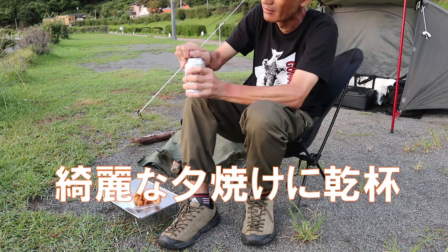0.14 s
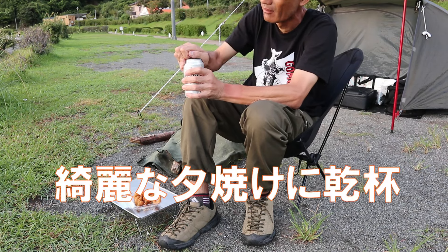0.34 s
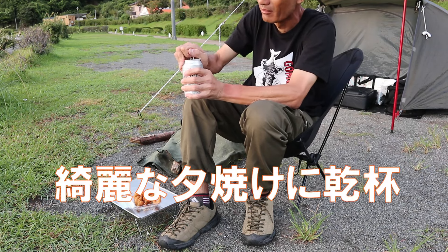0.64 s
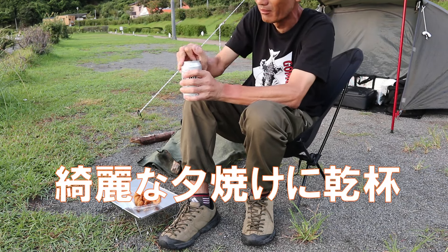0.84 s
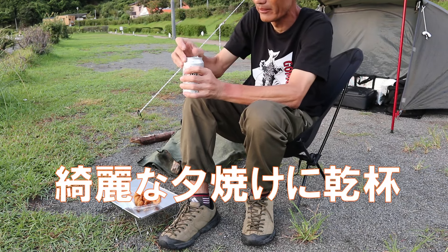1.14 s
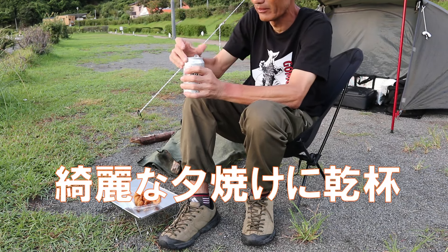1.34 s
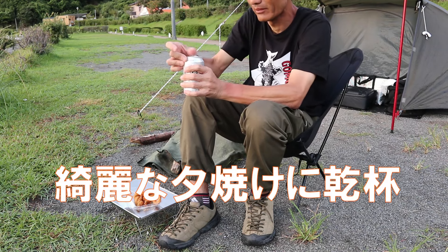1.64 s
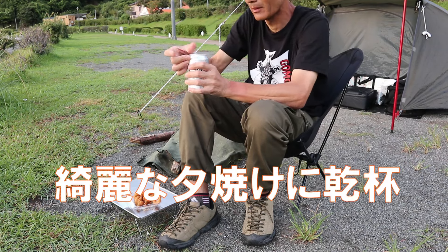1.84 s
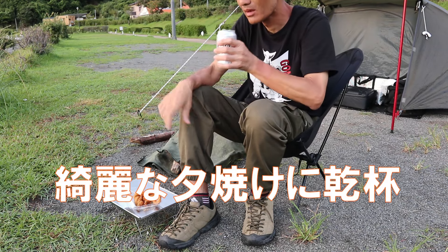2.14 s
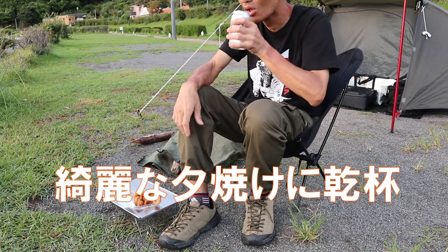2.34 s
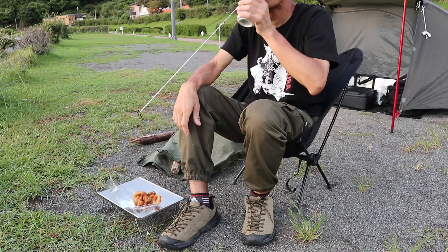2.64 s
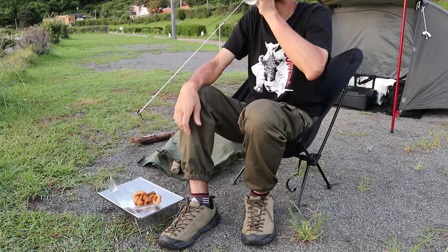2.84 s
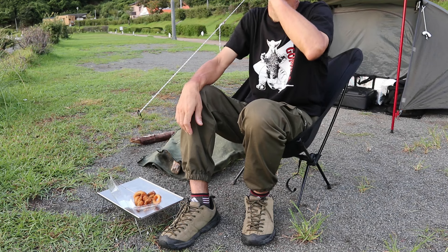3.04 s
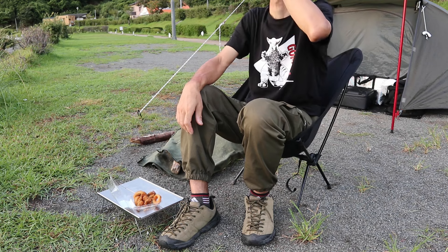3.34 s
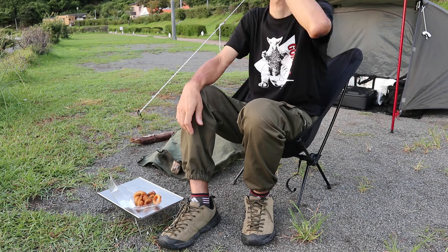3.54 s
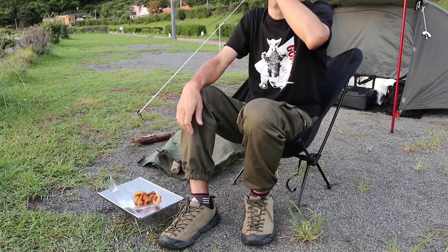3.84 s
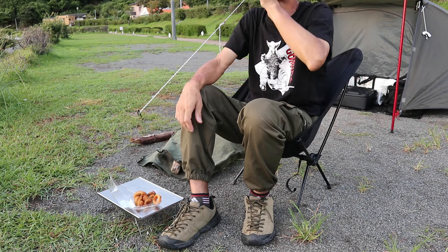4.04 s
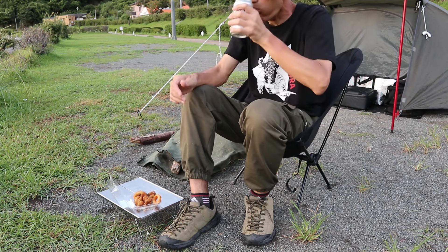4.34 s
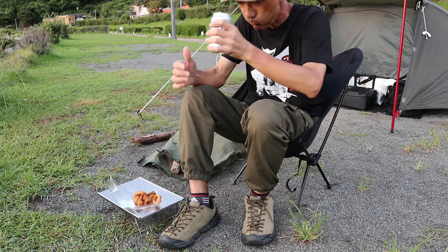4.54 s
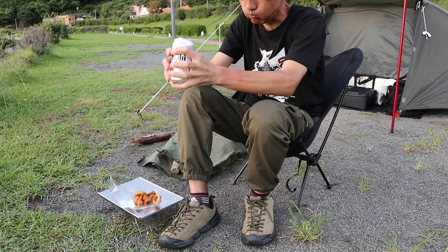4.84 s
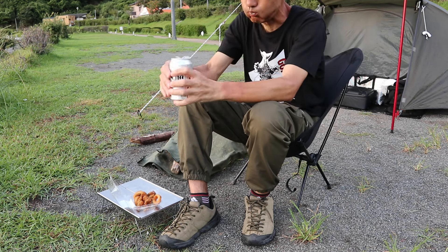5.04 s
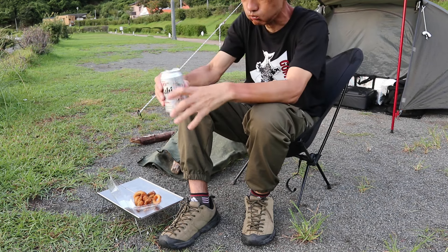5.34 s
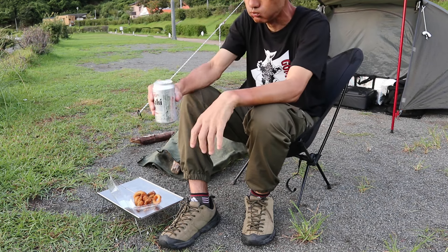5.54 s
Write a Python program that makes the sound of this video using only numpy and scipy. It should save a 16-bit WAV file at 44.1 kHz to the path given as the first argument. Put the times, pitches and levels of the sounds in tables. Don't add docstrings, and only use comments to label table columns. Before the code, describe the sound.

Close snap, brief gas hiss and hard aluminium clicks of an opening can outdoors, followed by faint cicada, road roar and a growing low engine drone.

```python
import sys
import numpy as np
from scipy import signal
from scipy.io import wavfile
from scipy.ndimage import uniform_filter1d, map_coordinates

SR = 44100
rng = np.random.default_rng(int(sys.argv[2]) if len(sys.argv) > 2 else 0)


def master(y):
    cut = np.clip(np.atleast_2d(y).T, -1, 1)
    pcm = np.round(cut * 32767)
    wavfile.write(sys.argv[1], SR, pcm.astype(np.int16))


def boost(x):
    u = np.asarray(x, float) / 20
    return 10 ** u


N = 251370


def evened(x):
    return x / np.sqrt(np.mean(x ** 2) + 1e-20)


def add(mix, s, sound):
    part = mix[round(s * SR):][:len(sound)]
    part += sound[:len(part)]


def trace(rows):
    s, *columns = np.transpose(rows)
    t = np.arange(s[0], s[-1], 1 / SR)
    return s[0], [np.interp(t, s, c) for c in columns]


def drift(rate, size=N):
    knots = rng.standard_normal(400)
    coarse = np.arange(0, size + 32, 32)
    curve = map_coordinates(knots, [coarse * rate / SR], order=3, mode="wrap")
    return np.interp(np.arange(size), coarse, curve)


def resonate(x, hz, width):
    turn = np.exp(2j * np.pi * np.cumsum(hz * np.ones(len(x))) / SR)
    r = np.exp(-np.pi * width / SR)
    once = signal.lfilter([1 - r], [1, -r], x / turn + 1e-18)
    twice = signal.lfilter([1 - r], [1, -r], once)
    return 2 * (turn * twice).real


def ring(modes, t, scale=1):
    return sum(boost(db - 60 * t / t60) * np.sin(2 * np.pi * hz * scale * t) for hz, db, t60 in modes)


# start in seconds, peak in dB, rim fizz in dB, lid note in Hz.
CAN_CRACKS = [
    (.3369, -2, -10, 5000),
    (.3382, -14, -20, 3700),
    (.3396, -14, -20, 3650),
              (.4242, 0.5, -25, 3270), (0.5811, -9.5, -28, 5050), (0.598, -26, -18, 4560),
              (.604, -31, -4, 4700), (.628, -36, 3, 4400), (0.636, -22, 19, 3920), (0.643, -24.5, -5, 4600),
              (.649, -31, -1, 4600), (.676, -47, -4, 4600), (.68951, -3, -10.5, 3400),
              (0.68952, -4, -13, 5800), (.6891, -15, -4, 4300), (.7025, -51, 0, 4300),
              (.710, -41, -6, 4800), (.724, -39, -3.5, 4500), (0.779, -33.5, -6, 4530),
              (.803, -52, -4, 5530), (.81, -52, -4, 4970), (0.847, -33.5, -22, 5050),
              (.853, -34, -12, 3300), (.87, -37, -13, 3000), (1.608, -35, -9, 2203), (3.505, -38, 20, 5900),
              (3.512, -45, 18, 6000)]
# frequency as a multiple of the note, level in dB, t60 in seconds.
LID_MODES = [(.72, -43, .003), (1, 10, 0.0067), (1.12, 10, 0.0037), (1.48, 6, 0.0029), (1.9, -5, 0.00268)]
# frequency in Hz, level in dB, t60 in seconds.
RIM_MODES = [(7850, 14.5, 0.0017), (9600, 4, 0.0057), (10400, -4, 0.0052), (13000, -24, .003)]


def cracks():
    out, t = np.zeros(N), np.arange(800) / SR
    for s, peak_db, fizz_db, note_hz in CAN_CRACKS:
        drive = 0.19 * rng.standard_normal(300) * np.exp(-t[:300] / 0.0015)
        drive[0] = 1
        rim_scale = 1 + 0.041 * rng.uniform(-1.2, 1)
        metal = ring(LID_MODES, t, note_hz) + boost(fizz_db) * ring(RIM_MODES, t, rim_scale)
        sound = np.convolve(drive, metal)
        add(out, s, boost(peak_db) * sound / abs(sound).max())
    return out


# start in seconds, peak in dB, low ring in dB, spring-back share 0-1, choked after seconds.
SHELL_DENTS = [
    (.4244, -1.5, -5.5, 0.42, 0.0047),
    (0.5808, -19, -18, 0.7, 0.0048),
    (0.6897, 2.5, 0.5, 0.07, 0.0033),
]
# frequency in Hz, level in dB, t60 in seconds.
SHELL_MODES = [(1473, 2, 0.14)]
# frequency in Hz, level in dB, t60 in seconds.
LOW_SHELL_MODES = [(617, -8.5, 0.044), (1174, -1.5, 0.069)]


def dents():
    out, t = np.zeros(N), np.arange(2600) / SR
    rebound_s = 0.002176
    for s, peak_db, low_db, rebound, grip_s in SHELL_DENTS:
        sound = ring(SHELL_MODES, t) + boost(low_db) * ring(LOW_SHELL_MODES, t)
        add(sound, rebound_s, -rebound * sound.copy())
        sound *= np.exp(-(t / grip_s) ** 6)
        sound += ring([(1560, -23, 0.048)], t)
        add(out, s, -boost(peak_db) * sound / abs(sound).max())
    return out


def jet_course():
    tight, wide = 1.16, 0.88
    return [(.3366, -49.5, tight), (.33699, -15, tight), (.3406, -23, 1), (.37, -21, 1),
            (.403, -25, wide), (.419, -30.5, 1), (.437, -49.5, 1), (.47, -49.5, wide)]


# frequency in Hz, width in Hz, level in dB.
SLIT_TONES = [(5400, 4000, 5), (10300, 2800, 5), (11780, 2200, -14.5)]
# frequency in Hz, width in Hz, level in dB.
HOLLOW_BODY = [(1477, 660, -1), (3050, 1700, -13.5), (673, 633, -8)]


def gas():
    s, (db, slit) = trace(jet_course())
    jet = rng.standard_normal(len(db)) * boost(0.76 * drift(350, size=len(db)))
    tones = sum(boost(d) * evened(resonate(jet, hz * slit, w)) for hz, w, d in SLIT_TONES)
    body = sum(boost(d) * evened(resonate(jet, hz, w)) for hz, w, d in HOLLOW_BODY)
    body *= 1.5 - np.exp(-np.arange(len(db)) / SR / 0.021)
    out = np.zeros(N)
    add(out, s, boost(db) * evened(tones + body + 1.03 * jet))
    return out


def can():
    highpass = signal.butter(N=4, Wn=420, btype="high", fs=SR, output="sos")
    near = signal.sosfilt(highpass, cracks() + dents() + gas())
    t = np.arange(4000) / SR
    scatter = uniform_filter1d(rng.choice([-1., 1.], (2, len(t))), size=3) * boost(-60 * t / 0.048)
    ground = signal.fftconvolve(near[None], scatter / np.linalg.norm(scatter[0]), axes=1)[:, :N]
    slap, slap_s = np.zeros(N), .0535
    add(slap, slap_s, resonate(near, 1880, 920))
    add(slap, slap_s + 0.00436, 0.47 * resonate(near, 1400, 570))
    side = signal.lfilter([1, -.7], [1], near)
    direct = near + 0.32 * side * np.array([[1], [-1]])
    return direct + boost(-26) * ground + boost(-26) * slap


def song(tables, width, throb_hz, overtone_db):
    out = np.zeros((2, N))
    for rows in tables:
        s, (hz, db) = trace(rows)
        size = len(hz)
        hz = hz * (1 + .006 * drift(45, size=size))
        shared = rng.standard_normal(size)
        level = boost(db + 1.05 * drift(throb_hz, size=size)) * signal.windows.tukey(size, .08)
        for ear in out:
            noise = shared + 0.62 * rng.standard_normal(size)
            tone = evened(resonate(noise, hz, width))
            tone += boost(overtone_db) * evened(resonate(noise, 2 * hz, 2 * width))
            tone += 0.34 * evened(resonate(noise, hz, 4.6 * width))
            add(ear, s, level * tone)
    return out


# start in seconds, loudest in seconds, end in seconds, level in dB.
TAB_RUBS = [
    (0.582, 0.588, 0.665, -44.5),
    (0.628, 0.643, .657, -39.5),
    (0.674, 0.675, .688, -37),
]


def tab_rubs():
    hz, ends_db = 1552, -12
    rubs = [[(s, hz, db + ends_db), (top_s, hz, db), (end_s, hz, db + ends_db)]
            for s, top_s, end_s, db in TAB_RUBS]
    return song(rubs, width=220, throb_hz=60, overtone_db=-13)


# time in seconds, firing rate in Hz, level in dB.
ENGINE_COURSE = [(0, 86.6, -61), (.33, 86.34, -45), (.62, 86, -46.5), (1.0, 85.8, -55), (1.28, 86.4, -54),
                 (1.52, 86.5, -40), (1.72, 86.5, -55.5), (2.1, 86.8, -39), (2.5, 86.76, -50),
                 (2.88, 86.86, -36.5), (3.45, 87.46, -34.5), (3.68, 87.7, -45.5), (3.93, 87.16, -33.5),
                 (4.17, 86.4, -35), (4.329, 83.65, -30), (4.7, 79, -31.5), (5.0, 77.16, -28.5),
                 (5.7, 73.6, -30.5)]
# multiple of the firing rate, level in dB relative to the first order.
UNEVEN_ORDERS = [(0.501, -56), (0.748, -26.5), (1.25, -12.5), (1.5, -14), (1.75, -15), (2.25, -26.5),
                 (2.499, -18.5), (2.75, -15.5), (3.25, -23), (3.499, -25), (3.75, -25.5), (4, -26),
                 (4.25, -26.5)]
# centre in seconds, multiple of the firing rate, length in seconds, gain in dB.
ORDER_GUSTS = [(2.45, 2.499, .25, 8), (.12, 2.75, .2, 14), (2.85, 1.25, .3, 9), (3.7, 1.25, .6, 9),
               (3.6, 2, .35, 5), (4.37, 2.75, .11, 16), (4.6, 3, .2, 6), (4.62, 2, .14, 10),
               (4.7, 1.75, .2, 7), (4.94, 2, .06, 8), (5.1, 3, .06, 8), (5.2, 1.75, .3, 7),
               (5.35, 2, .2, 9), (5.36, 3, .1, 9), (5.65, 3, .15, 6), (5.7, 2, .15, 7)]
# time in seconds, frequency in Hz, level in dB.
LOW_ENGINE = [
    (2.6, 62.2, -63),
    (2.9, 62.1, -50),
    (3.2, 61.2, -51),
    (3.6, 60.86, -45),
    (4.4, 60, -48),
    (5.7, 57.5, -45.5),
]


def engine():
    t, (s, *columns) = np.arange(N) / SR, np.transpose(ENGINE_COURSE)
    hz, first_db = (np.interp(t, s, c) for c in columns)
    turns = np.cumsum(hz * (1 + 0.00579 * drift(14))) / SR
    facing = .5 + .5 * np.tanh((t - 4.2) / .45)
    lines = [(1, first_db), (2, -51.5 + 8 * facing), (3, -64 + 17 * facing)]
    slow_db = uniform_filter1d(first_db, size=20000) - 3
    lines += [(order, slow_db + db) for order, db in UNEVEN_ORDERS]
    out = np.zeros(N)
    for order, db in lines:
        gust_db = sum(gain * np.exp(-((t - at) / length) ** 2)
                      for at, gust_order, length, gain in ORDER_GUSTS if abs(gust_order / order - 1) < .06)
        level = boost(db + 0.98 * gust_db + 2.03 * drift(9))
        out += level * np.cos(2 * np.pi * (order * turns + rng.random()))
    start, (low_hz, low_db) = trace(LOW_ENGINE)
    low_level = boost(low_db + 1.8 * drift(7, size=len(low_hz)))
    add(out, start, low_level * np.sin(2 * np.pi * np.cumsum(low_hz) / SR))
    return np.sqrt(2) * out


def read(points, hz):
    f, value = np.transpose(points)
    return np.interp(np.log(hz + 1), np.log(f + 1), value)


# frequency in Hz, likeness 0-1.
PORT_LIKENESS = [(60, 0.98), (130, 1), (290, 0.61), (640, 0.55), (1400, 0.46), (4000, 0.45), (15000, 0.67)]


def wash(spectrum, patchy_db, swell_db):
    frames, hz = N // 256 + 5, np.fft.rfftfreq(1024, 1 / SR)
    a, b, c, d, patches = rng.standard_normal((frames, 513, 5)).T
    patches = evened(uniform_filter1d(uniform_filter1d(patches, size=12, axis=0), size=14, axis=1))
    same = read(PORT_LIKENESS, hz)[:, None]
    left, other = a + 1j * b, c + 1j * d
    z = np.array([left, same * left + np.sqrt(1 - same ** 2) * other])
    z *= boost(read(spectrum, hz)[:, None] + patchy_db * patches)
    noise = signal.istft(z, nperseg=1024, noverlap=768)[1][:, :N]
    return noise * boost(swell_db * drift(2.75))


# closest in seconds, level in dB, seconds to travel its own distance, exhaust weight in dB.
ROAD_PASSES = [
    (0.0, -53, 0.86, -4.5),
    (2.4, -46, 0.2, -3),
    (2.62, -50, 0.15, -3),
    (2.92, -44, 0.45, -4.5),
    (4.3, -45, 0.34, -10),
    (4.9, -47.5, 0.29, -7),
    (5.5, -48, 0.36, -5.5),
]
# frequency in Hz, density in dB per Hz.
TYRE_ROAR = [(15, -49), (25, -29), (65, 6), (90, 0.5), (127, -6.5), (237, -3.5), (311, -16.5), (980, -10.5),
             (2190, -23.5), (2950, -28.5), (5110, -29.5), (6000, -64), (7800, -57), (13200, -120)]


def road():
    t = np.arange(N) / SR
    far_power, far_exhaust_db = boost(-60) ** 2, -5.5
    near = [boost(db) ** 2 / (1 + ((t - s) / span) ** 2) for s, db, span, _ in ROAD_PASSES]
    power = far_power + sum(near)
    weighted = far_power * far_exhaust_db + sum(p * row[3] for p, row in zip(near, ROAD_PASSES))
    exhaust_db = weighted / power
    roar = evened(wash(TYRE_ROAR, patchy_db=1.5, swell_db=0.27))
    band = signal.butter(N=1, Wn=(250, 600), btype="band", fs=SR, output="sos")
    exhaust = signal.sosfilt(band, roar)
    return boost(5) * np.sqrt(power) * (roar + (boost(exhaust_db + 7) - 1) * exhaust)


# start in seconds, length in seconds, first Hz, last Hz, level in dB.
CICADA_NOTES = [(.86, 0.2, 5000, 5000, -66), (1.0, 0.18, 4820, 4650, -59), (1.123, 0.19, 4370, 3800, -61),
                (1.27, .16, 3540, 4600, -60), (1.38, .24, 4380, 4500, -56.5),
                (1.631, 0.56, 4410, 4330, -57.5), (2.463, 0.26, 5650, 5250, -64.5),
                (2.659, .24, 4704, 4220, -56.5), (2.871, 0.115, 3850, 3660, -60),
                (3.03, 0.128, 4850, 4900, -56), (3.091, .31, 4543, 4120, -57),
                (3.621, 0.22, 4930, 4553, -57.5), (3.779, 0.74, 4500, 4210, -54),
                (4.879, 0.36, 4540, 4626, -56.5), (5.218, .47, 4280, 4080, -56)]


def cicada():
    notes = [[(s, .96 * first_hz, db - 7), (s + .07, first_hz, db),
              (s + length - .06, last_hz, db), (s + length, .93 * last_hz, db - 4)]
             for s, length, first_hz, last_hz, db in CICADA_NOTES]
    return song(notes, width=140, throb_hz=53.9, overtone_db=-42.5)


# start in seconds, length in seconds, level in dB.
RASP_CHIRPS = [
    (1.68, 0.1, -58),
    (2.94, .12, -57),
    (5.064, .13, -57.5),
]


def rasps():
    hz = 7100
    chirps = [[(s, hz, db - 2), (s + .4 * length, 1.057 * hz, db), (s + length, 1.06 * hz, db - 4)]
              for s, length, db in RASP_CHIRPS]
    return song(chirps, width=420, throb_hz=147, overtone_db=-43)


# frequency in Hz, width in Hz, level in dB, chirps a second, depth 0-1.
CRICKET_BANDS = [
    (5110, 220, -64.5, 2.9, 0.77),
    (6320, 660, -65, 27, 0.23),
]


def crickets():
    out = np.zeros((2, N))
    for hz, width, db, rate, depth in CRICKET_BANDS:
        beat = np.cos(2 * np.pi * np.cumsum(rate * (1 + .3 * drift(1.7))) / SR)
        level = boost(db) * (1 + depth * beat) * boost(1.3 * drift(2.5))
        shared = rng.standard_normal(N)
        for ear in out:
            ear += level * evened(resonate(shared + 0.86 * rng.standard_normal(N), hz, width))
    return out


# start in seconds, length in seconds, level in dB.
FAR_SQUEAKS = [
    (0.044, 0.3, -57.5),
    (1.24, 0.2, -56),
    (2.28, 0.203, -55),
]
# time in seconds, frequency in Hz, level in dB.
SQUEAK_FLIP = [
    [(1.425, 2115, -55), (1.455, 2794, -56)],
]


def squeaks():
    hz = 1700
    first, second, third = ([[(s, hz, db - 1.5), (s + 0.56 * length, 1.09 * hz, db),
                              (s + length, 1.24 * hz, db + 1.5)]] for s, length, db in FAR_SQUEAKS)
    return song(first, 100, 30, -9) + song(second + SQUEAK_FLIP, 40, 30, -7) + song(third, 120, 30, -18)


# time in seconds, frequency in Hz, level in dB.
FAR_KNOCK = [
    [(2.09, 340, -68), (2.12, 351.4, -44), (2.16, 340, -56)],
]


def knock():
    return song(FAR_KNOCK, width=27, throb_hz=17, overtone_db=-42)


# frequency in Hz, density in dB per Hz.
OPEN_AIR = [(15, -36), (25, -10), (75, -3), (221, -5), (399, -21.5), (684, -17.5), (762, -14), (945, -17.5),
            (1380, -27), (1800, -14), (3340, -20.5), (5010, -21.5), (11800, -36), (15500, -81)]
# frequency in Hz, density in dB per Hz.
HIGH_HISS = [(4000, -29), (7000, -11), (9000, 4.5), (12000, -3), (15000, -1)]


def air():
    murmur = evened(wash(OPEN_AIR, patchy_db=1.2, swell_db=.6))
    hiss = evened(wash(HIGH_HISS, patchy_db=3.5, swell_db=1.2))
    return boost(-47.5) * murmur + boost(-66) * hiss


def scene():
    far = engine() + road() + cicada() + rasps() + crickets() + squeaks() + knock() + air()
    lag = 2
    far[0, lag:] = far[0, :-lag].copy()
    return far + can() + tab_rubs()


def band_limit(x):
    return signal.sosfilt(signal.butter(12, 16860, fs=SR, output="sos"), x)


def record(dry):
    rolloff = signal.butter(N=10, Wn=13360, fs=SR, output="sos")
    dull = signal.sosfilt(rolloff, dry)
    power_db = 10 * np.log10(abs(uniform_filter1d((dull ** 2).mean(0), size=200)) + 1e-12)
    dip_db = .25 * np.maximum(power_db + 24, 0)
    creep_db = np.arange(N) * 6.5 / SR
    held_db = np.maximum.accumulate(dip_db + creep_db) - creep_db
    late_db = signal.lfilter([1 / 600], [1, 1 / 600 - 1], held_db)
    mix = np.clip(dull / boost(late_db), -1, 1)
    return band_limit(mix)


dry = scene()
out = record(dry)
master(out)
```